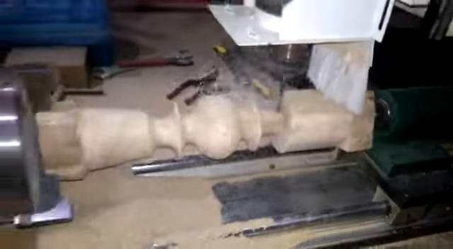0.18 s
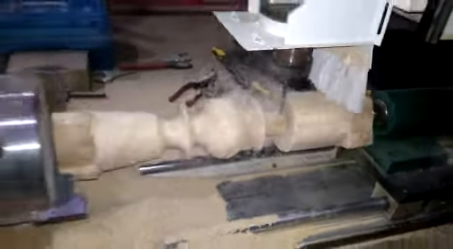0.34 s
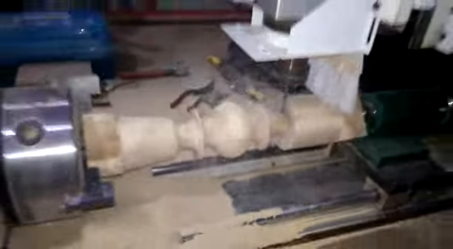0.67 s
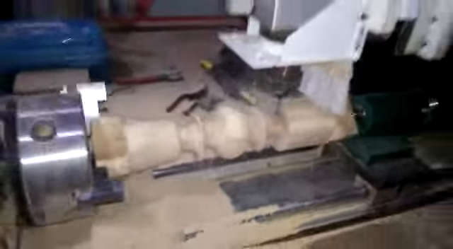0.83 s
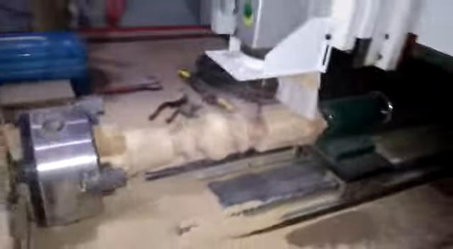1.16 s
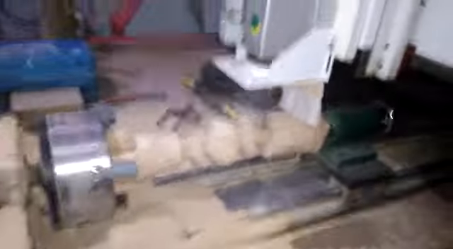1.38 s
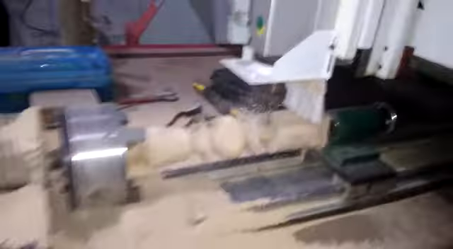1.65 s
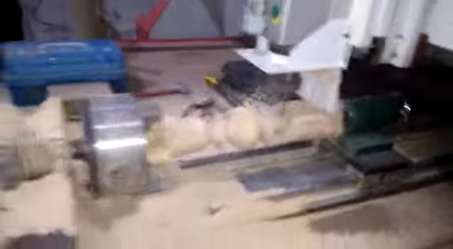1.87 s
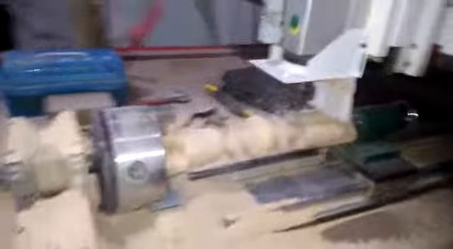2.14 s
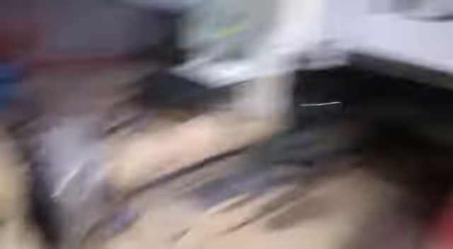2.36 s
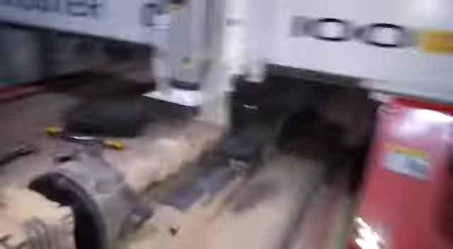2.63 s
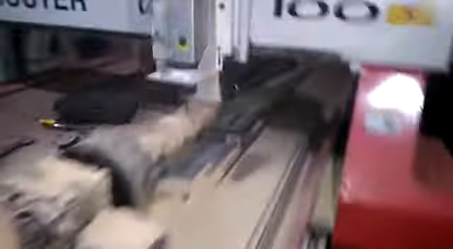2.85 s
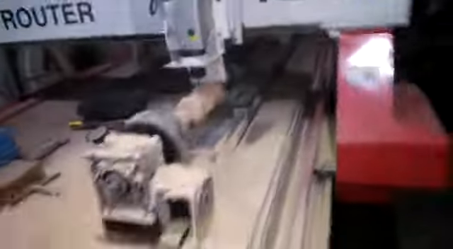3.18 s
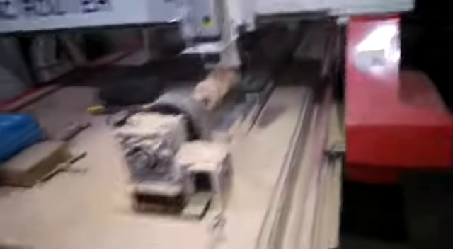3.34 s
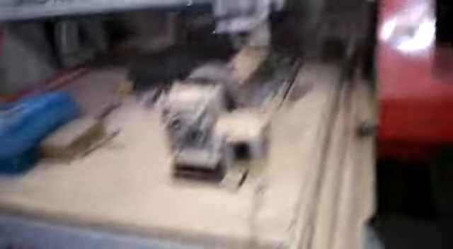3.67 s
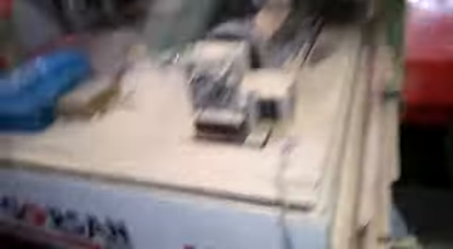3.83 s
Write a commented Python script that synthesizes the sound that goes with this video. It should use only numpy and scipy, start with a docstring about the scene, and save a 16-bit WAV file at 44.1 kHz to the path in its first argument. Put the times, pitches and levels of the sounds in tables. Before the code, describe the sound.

A router spindle carves wood in a workshop, with a high, wavering whine over rasping, hum and air hiss. The cutter scrapes and lifts off, then screeches back in and chatters, as the hand-held microphone is softly bumped.

```python
"""A router spindle carves a turning wooden post in a workshop, heard from a moving hand-held camera.
From the start the spindle hums, its drive whistles and air hisses, while the cutter spits, rasps and
sings near 1.55 kHz with sidebands one spindle turn apart. Around 2.5 s it scrapes and lifts off the
wood, leaving a lull. At 3.28 s it bites in again with a screech and a crunch of chips, then sings on
near 1.6 kHz, chattering harder, as the hand bumps the camera."""
import sys
import numpy as np
from scipy import signal
from scipy.fft import rfft, irfft, next_fast_len
from scipy.io import wavfile
from scipy.ndimage import uniform_filter1d, map_coordinates

SR = 44100
rng = np.random.default_rng(int(sys.argv[2]) if len(sys.argv) > 2 else 0)


def wrap_up_sound(samples):
    """Save the sound to the file named by the first command line argument, as 16-bit audio."""
    columns = np.atleast_2d(samples).T
    # keep every value between -1 and 1, then stretch to whole-number steps
    tamed = np.clip(columns, -1, 1)
    steps = np.round(tamed * 32767).astype(np.int16)
    wavfile.write(sys.argv[1], SR, steps)


N = 176400
T = np.arange(N) / SR
SPINDLE_HZ = 202.14
TURN = 2 * np.pi * SPINDLE_HZ * T  # spindle phase


def amp(db):
    return 10 ** (np.asarray(db) / 20)


def unit(x):
    return x / np.sqrt(np.mean(x ** 2) + 1e-20)


def along(points, hz):
    """An EQ curve on a log frequency axis."""
    f, v = np.transpose(points)
    return np.interp(np.log(hz + 1), np.log(f + 1), v)


def curves(rows):
    """One automation lane for each column after the time."""
    times, *columns = np.transpose(rows)
    return [np.interp(T, times, column) for column in columns]


def swells(rows):
    """Bell-shaped envelopes."""
    return sum(amp(db) * np.exp(-((T - s) / half) ** 2) for s, half, db in rows)


def wobble(rate):
    """A smooth random LFO, rate knots a second."""
    return map_coordinates(rng.standard_normal(int(N * rate / SR) + 4), [T * rate])


def filtered(x, response):
    """Zero-phase EQ with gain response(hz)."""
    size = next_fast_len(N + SR // 2)
    return irfft(rfft(x, size) * response(np.fft.rfftfreq(size, 1 / SR)), size)[..., :N]


# Stereo image: f/Hz, left-right correlation
LIKENESS = [(60, 0.8), (180, 0.88), (550, 0.89), (1650, 0.45), (4970, -0.14), (15000, 0.12)]
# Stereo balance: f/Hz, left over right/dB
BALANCE = [(60, 1.0), (150, 4.5), (950, 4.9), (2380, 9.5), (5980, 6.4), (15000, 16.6)]
def rush(spectrum, patchy_db):
    """Stereo noise, mottled in time and frequency; mid rms 1."""
    bins = signal.stft(rng.standard_normal((2, N)), nperseg=512)[2]
    patches = uniform_filter1d(rng.standard_normal(bins.shape[1:]), size=5, axis=0)
    patches = uniform_filter1d(patches, size=12, axis=1)
    pair = signal.istft(bins * amp(patchy_db * unit(patches)), nperseg=512)[1][:, :N]
    width = lambda hz: np.arccos(np.clip(along(LIKENESS, hz), -1, 1)) / 2
    mid, side = filtered(pair, lambda hz: amp(along(spectrum, hz))
                         * [np.cos(width(hz)), np.sin(width(hz))])
    pan = lambda hz: amp(np.outer([.5, -.5], along(BALANCE, hz)))
    out = filtered(np.array([mid + side, mid - side]), pan)
    return out / np.std(out.mean(0))


def tone(phase, left_db, right_db, lead, rough):
    """A stereo sine; left lead and phase jitter (rough) are in radians."""
    phase = phase + rough * wobble(40) + rng.uniform(0, 2 * np.pi)
    return np.sqrt(2) * np.array([amp(left_db) * np.sin(phase + lead / 2),
                                  amp(right_db) * np.sin(phase - lead / 2)])


def drifting(phase, db, pan_db, rough=0.43, swell_db=3.0):
    """A tone whose level and side wander as the camera moves."""
    left_db = db + pan_db / 2 + swell_db * wobble(4.89)
    right_db = db - pan_db / 2 + swell_db * wobble(4.98)
    return tone(phase, left_db, right_db, 1.66 * wobble(1.56), rough)


# Air bed fader: t/s, level/dB
AIR_LEVEL = [(0, -41.5), (.3, -42), (.77, -46), (2.1, -44.5), (2.6, -47.5), (3, -51.5), (3.25, -50),
             (4, -49.5)]
# Its colour: f/Hz, level/dB
AIR_EQ = [(2650, -19), (4500, -16), (7370, -12), (8790, -4.5), (9800, 3), (10700, -2), (13000, -14),
          (13700, -20), (14500, -21), (15600, -21)]
def air():
    """Bright air hiss, pulsing faintly once a turn."""
    level = amp(curves(AIR_LEVEL)[0] + 0.2 * wobble(6.7))
    return level * (1 + 0.055 * np.cos(TURN)) * rush(AIR_EQ, patchy_db=1.7)


# Machine noise faders: t/s, roar level/dB, rasp level before its boost/dB
MACHINE_LEVELS = [(.1, -53.5, -49), (.35, -56.5, -51.5), (.55, -53, -51), (.8, -56, -53.5),
                  (1.5, -56, -55.5), (2.6, -58.5, -54.5), (3.2, -59.5, -59), (3.35, -56, -57),
                  (3.6, -56.5, -53), (4, -56.5, -52.5)]
# Roar colour: f/Hz, level/dB
ROAR_EQ = [(45, -42), (90, -7.5), (150, -22), (250, -11.5), (400, -6), (740, 0.5), (1050, -6.5),
           (1200, 2.5), (1320, -10), (2200, -46)]
def motor():
    """Low motor roar, pulsing once a turn."""
    level = amp(curves(MACHINE_LEVELS)[0] + 0.44 * wobble(5.87))
    return level * (1 + 0.27 * np.cos(TURN)) * rush(ROAR_EQ, patchy_db=2.0)


# Hum fader: t/s, level/dB
HUM_LEVEL = [(0, -57), (1.3, -62), (1.7, -64.5), (2.5, -61.5), (3.5, -66.5), (3.65, -60), (4, -56)]
# Harmonics that ride the roar: multiples of the spindle rate
HARMONICS = [2, 4, 8, 10, 12]
# Their mix: base level/dB
HARMONIC_MIX = [-69.5, -67, -61.5, -70.5, -73]
# The top two ring out as the cutter leaves the wood: t/s, gain/dB
LIFT_OFF_GAIN = [(2.35, 0), (2.6, 22), (2.8, 11), (2.9, -7)]
# The fluttering sixth harmonic carries the lull: t/s, level/dB
SIXTH_LEVEL = [(.7, -57.5), (1.3, -63), (2.4, -63), (2.75, -57.5), (3.15, -56.5), (3.6, -61)]
def spindle(hum_pan_db=5):
    """Hum at the turning rate, with its harmonics."""
    hum_db, roar_db = curves(HUM_LEVEL)[0], curves(MACHINE_LEVELS)[0]
    out = tone(TURN, hum_db + hum_pan_db / 2, hum_db - hum_pan_db / 2, lead=-.3, rough=.05)
    for k, db in zip(HARMONICS, HARMONIC_MIX):
        ride_db = roar_db - roar_db.mean() + (k >= 10) * curves(LIFT_OFF_GAIN)[0]
        out += drifting(k * TURN, db + ride_db, pan_db=6.5, rough=0.35)
    sixth_db = curves(SIXTH_LEVEL)[0] + 3 * wobble(22)
    return out + drifting(6 * TURN, sixth_db, pan_db=6, rough=.6, swell_db=1)


# Drive tones: f/Hz, level/dB
DRIVE_TONES = [(14002, -65), (14409, -64), (14815, -67)]
def drive():
    """Thin whistle of the drive electronics, off to the left."""
    return sum(drifting(2 * np.pi * hz * T, db, pan_db=12, rough=.5, swell_db=1.5)
               for hz, db in DRIVE_TONES)


# Hand bumps: t/s, half length/s, f/Hz, level/dB
BUMPS = [(3.277, 0.031, 153, -39.5), (3.405, 0.034, 190.7, -47.5), (3.432, 0.053, 121, -50),
         (3.953, 0.039, 98.6, -56)]
def handling():
    """Soft bumps of the hand on the camera, each in a longer rumble."""
    bumps = sum(swells([(s, half, db)]) * np.sin(2 * np.pi * hz * T + 1.54 * wobble(50))
                for s, half, hz, db in BUMPS)
    rubs = swells((s, 1.5 * half, db) for s, half, _, db in BUMPS)
    noise = rng.standard_normal(N) + 0.81 * rng.standard_normal((2, N))
    rumble = filtered(noise, lambda hz: hz / (1 + (hz / 70) ** 3))
    return bumps * amp([[2.5], [-2.5]]) + amp(-11.5) * rubs * unit(rumble)


# Cues for rough scrapes and sharp spits: t/s, half length/s, level/dB
SCRAPE_CUES, SPIT_CUES = [(2.4, 0.024, -56), (2.54, 0.07, -50), (2.68, 0.037, -48)], [(.037, 0.012, -27.5), (.075, 0.033, -36)]
# Scrape, spit and swish colours: f/Hz, level/dB
SCRAPE_EQ, SPIT_EQ, SWISH_EQ = [(500, -44), (800, -6), (1200, 1), (1600, -40)], [(5000, -20), (8200, -4), (9200, 6.5), (10500, -21),
                                                (15700, -26)], [(4300, -30), (5500, 6), (6600, -22)]
def chips():
    """Puffs of noise: opening spits, scrapes at lift-off, a last light swish."""
    layers = [(SCRAPE_CUES, SCRAPE_EQ), (SPIT_CUES, SPIT_EQ), ([(3.89, 0.069, -50.5)], SWISH_EQ)]
    return sum(swells(cues) * rush(eq, patchy_db=3.5) for cues, eq in layers)


def overtones(phase, spectrum, rough, sideband_loss_db=4):
    """Cutter harmonics, each with sidebands a spindle turn apart; mid rms 1."""
    out = np.zeros((2, N))
    for h in range(2, 10):
        harmonic = h * phase + rough * h ** .5 * wobble(60)
        swell = amp(1.8 * wobble(6.2))
        for k in range(-2, 4):
            gain = amp(rng.normal(0, 2.6, (2, 1)) - sideband_loss_db * abs(k))
            out += gain * swell * np.sin(harmonic + k * TURN + rng.uniform(0, 2 * np.pi, (2, 1)))
    out = filtered(out, lambda hz: amp(along(spectrum, hz) + np.outer([.5, -.5], along(BALANCE, hz))))
    return out / np.std(out.mean(0))


# Rasp colour: f/Hz, level/dB
RASP_EQ = [(700, -40), (1200, -6.5), (1600, -2.5), (2300, -2.5), (3100, -2), (4400, -6.5), (5500, -6.5),
           (7500, -14), (10500, -36)]
def rasp(boost_db=5, pitched_db=-9):
    """The cut rasps once a turn, with a pitched edge while the cutter is in the wood."""
    level = amp(curves(MACHINE_LEVELS)[1] + boost_db + .5 * wobble(8))
    in_wood = curves(CUTTER_LANES)[0] > -60
    grit = (1 + 0.13 * np.cos(TURN)) * rush(RASP_EQ, patchy_db=1.2)
    edge = amp(pitched_db) * in_wood * overtones(cutter_phase(), RASP_EQ, rough=.15)
    return level * (grit + edge)


# Chatter fader: t/s, level/dB
CHATTER_LEVEL = [(0, -57), (1.2, -60), (2.1, -60), (2.5, -49), (2.8, -72), (3.25, -72), (3.29, -41),
                 (3.6, -48), (4, -42)]
# Its band around the cutter tone: f/Hz, level/dB
CHATTER_EQ = [(1250, -23), (1480, 2), (1950, -2.5), (2350, -9.5), (2700, -55)]
def chatter():
    """Rough narrow noise of the cutter stuttering on the wood."""
    return amp(curves(CHATTER_LEVEL)[0] + 2.1 * wobble(25.01)) * rush(CHATTER_EQ, patchy_db=4.5)


# Bite cue: t/s, hold/s, level/dB
BITE_CUES = [(3.281, .11, -27)]
# Screech colour: f/Hz, level/dB
SCREECH_EQ = [(3000, -30), (4600, -23), (5300, -6), (6380, -2.5), (7270, -14), (8000, -7), (8770, -9),
              (9680, 0), (11200, -6), (13500, -21), (14400, -13), (15700, -28)]
BITE_PHASE = 2 * np.pi * 1599 * T
def bite(attack_s=.014, fall_db_per_s=205):
    """The cutter digs in: harsh overtones over noise struck once a turn."""
    envelope = 0
    for s, hold, db in BITE_CUES:
        attack = np.clip((T - s) / attack_s + .5, 0, 1) ** 2
        envelope += attack * amp(db - fall_db_per_s * np.clip(T - s - hold, 0, None))
    strikes = 1 + .22 * np.cos(TURN + 0.73 * wobble(28))
    grit = strikes * rush(SCREECH_EQ, patchy_db=3.0)
    return envelope * (grit + amp(1.5) * overtones(BITE_PHASE, SCREECH_EQ, rough=0.4))


# Crunch cues: t/s, half length/s, level/dB
CRUNCH_CUES = [(.04, .03, -50), (3.289, .011, -39), (3.35, .016, -40.5)]
# Their colour: f/Hz, level/dB
CRUNCH_EQ = [(1500, -38), (2200, -5), (3100, -1), (4300, 1), (5000, -8), (7000, -13.5)]
def crunch():
    """Chips tear off: equal parts noise and cutter overtones."""
    texture = rush(CRUNCH_EQ, patchy_db=0.5) + overtones(BITE_PHASE, CRUNCH_EQ, rough=0.28)
    return swells(CRUNCH_CUES) * texture


# Cutter pitch line: t/s, f/Hz
PITCH_LINE = [(0, 1555), (.55, 1549), (1.1, 1549), (1.6, 1550), (2.2, 1562), (2.68, 1555), (2.71, 1602),
              (3.29, 1562), (3.34, 1593), (4, 1598)]
def cutter_phase():
    """Running phase of the singing cutter."""
    return 2 * np.pi * np.cumsum(curves(PITCH_LINE)[0]) / SR


# Lead tone: t/s, left level/dB, right level/dB, left lead/rad
CUTTER_LANES = [(.05, -32, -39, 1.5), (.22, -32, -56, 1.9), (.3, -29, -50, 2.4), (.335, -39.5, -39.5, 3.46),
                (.65, -36.5, -37, 3.62), (.8, -43.5, -54, 4.5), (1.05, -35.5, -39.5, 5.5),
                (1.44, -33, -48.5, 5.3), (1.55, -36, -54, 6.4), (1.71, -48, -58, 8.7),
                (1.75, -36, -46, 7.6), (2.09, -45, -49, 9.4), (2.12, -36.5, -34, 10.9),
                (2.3, -40.5, -33, 12.5), (2.45, -36, -34, 13), (2.54, -32.5, -49, 13.6),
                (2.63, -46, -49, 14.6), (2.72, -46, -55, 14.6), (2.9, -65, -70, 19), (3.24, -62, -64, 16),
                (3.29, -38, -33.5, 14.3), (3.33, -58, -52, 16.3), (3.37, -23, -28, 17.6),
                (3.42, -35.5, -48, 13.7), (3.5, -40, -42, 20.4), (3.87, -49, -53, 17),
                (3.93, -34.5, -55, 17.3), (4, -29, -36, 17.3)]
# Near sidebands: offset/spindle rates
NEAR_STEPS = [-1, 1, 2, 3]
# Their faders: t/s, level/dB at offsets -1, +1, +2, +3, left over right/dB at +1
NEAR_LANES = [(.06, -49, -64, -60, -52, 2), (.36, -54, -58, -56, -58, 0), (.52, -49.5, -56, -46, -45, 3),
              (.8, -52.5, -54, -60, -51, 3), (1.3, -64, -47.5, -57, -59, 0.5),
              (2.05, -59, -56, -57, -64, 4), (2.2, -59, -42.5, -52, -65, -17),
              (2.5, -48, -51, -50, -62, -10), (2.8, -70, -60, -56, -68, 10), (3.24, -69, -73, -80, -76, -1),
              (3.29, -63, -49, -52, -62, 5), (3.6, -68, -45, -48, -64, 3), (4, -62, -45, -49, -58, 10)]
# Far sidebands: offset before rounding/spindle rates, level relative to the tone/dB
FAR_MIX = [(-2, -25), (3.5, -27.5)]
# Octave overtone fader: t/s, level/dB
OCTAVE_LEVEL = [(0, -58), (.47, -53), (.56, -62), (.65, -57), (.85, -66), (1.05, -59), (1.22, -70),
                (1.45, -58), (2.5, -66), (2.75, -76), (3.4, -76), (3.55, -58)]
# Second mode fader: t/s, level/dB
MODE_LEVEL = [(0, -49), (.5, -69), (.6, -41), (.7, -68), (2.1, -55.5), (2.3, -50.5), (2.6, -62), (3.3, -88),
              (3.38, -46), (3.6, -51.5), (3.8, -42.5), (4, -40)]
# That mode and its sidebands: offset/spindle rates
MODE_STEPS = [0, 1, 2]
# Their mix: gain/dB
MODE_MIX = [0.5, -6.5, -8]
def cutter(second_mode_hz=1515):
    """The cutter sings in two modes, with sidebands spaced by the spindle rate."""
    phase = cutter_phase()
    left_db, right_db, lead = curves(CUTTER_LANES)
    after_bite = T > BITE_CUES[0][0]
    flutter_db = (1.74 + 1.7 * after_bite) * wobble(34)
    out = tone(phase, left_db + flutter_db, right_db + flutter_db, lead, rough=0.32)
    *near_db, pan_db = curves(NEAR_LANES)
    for k, db in zip(NEAR_STEPS, near_db):
        out += drifting(phase + k * TURN, db, pan_db if k == 1 else 3)
    tone_db = uniform_filter1d(np.maximum(left_db, right_db), size=8000)
    for k, db in FAR_MIX:
        out += drifting(phase + round(k) * TURN, tone_db + db, pan_db=9.8)
    out += drifting(2 * phase, curves(OCTAVE_LEVEL)[0], pan_db=6.4, rough=.4, swell_db=2.5)
    mode_phase = 2 * np.pi * second_mode_hz * T
    for k, db in zip(MODE_STEPS, MODE_MIX):
        out += drifting(mode_phase + k * TURN, curves(MODE_LEVEL)[0] + db, pan_db=1.4, rough=0.75)
    return out


def scene():
    """The dry stereo mix."""
    return (chips() + cutter() + chatter() + spindle() + drive() + motor() + rasp() + air()
            + bite() + crunch() + handling())


def record(dry):
    """The camera cuts deep bass and top treble; its microphone housing dips one narrow band."""
    low_cut_hz, notch_hz, top_hz = 79, 2604, 15750
    notch = lambda hz: 1 - 0.67 * np.exp(-((hz - notch_hz) / 143) ** 2)
    return filtered(dry, lambda hz: (hz < top_hz) * notch(hz) * hz ** 2 / (hz ** 2 + low_cut_hz ** 2))


dry = scene()
out = record(dry)
wrap_up_sound(out)
```